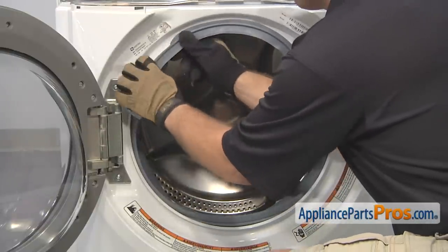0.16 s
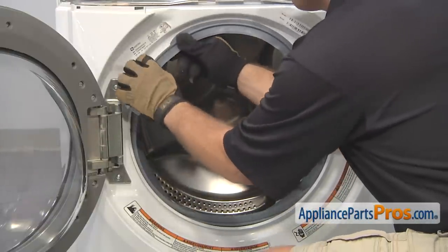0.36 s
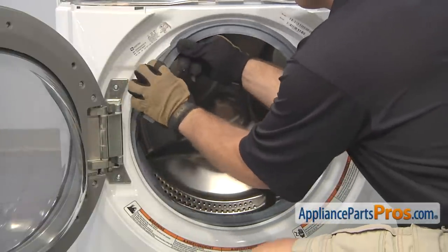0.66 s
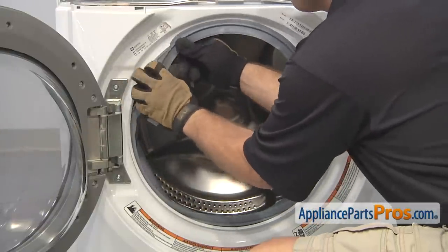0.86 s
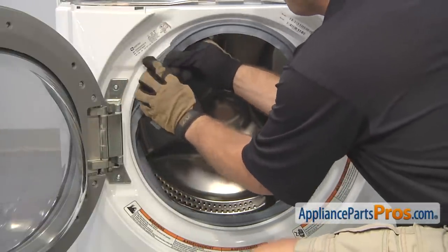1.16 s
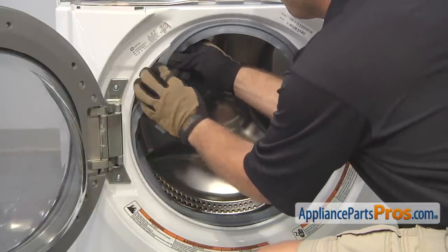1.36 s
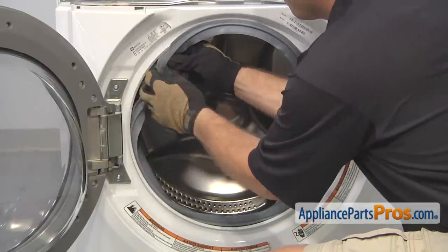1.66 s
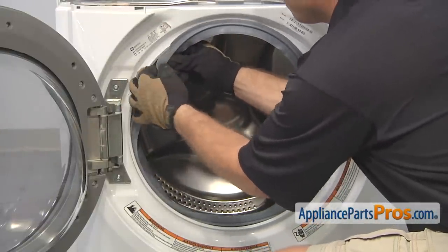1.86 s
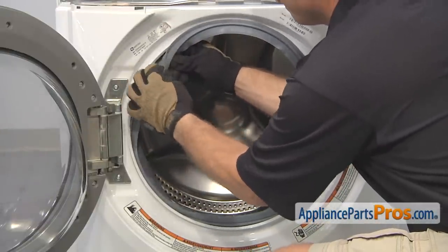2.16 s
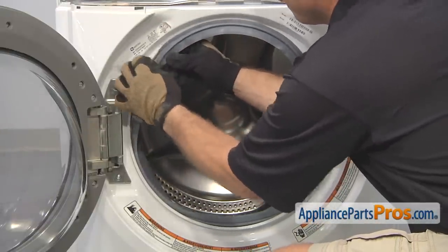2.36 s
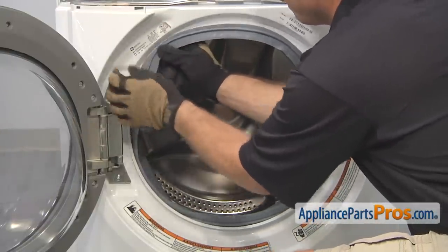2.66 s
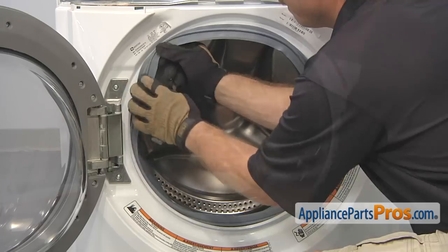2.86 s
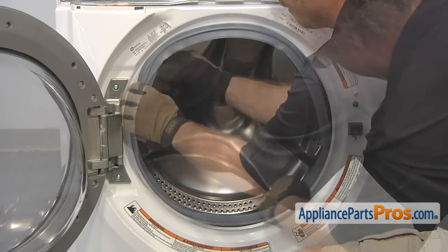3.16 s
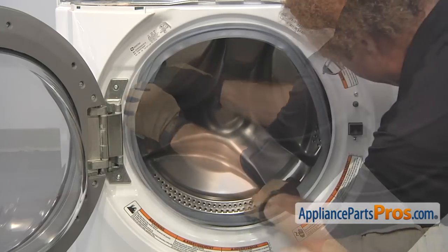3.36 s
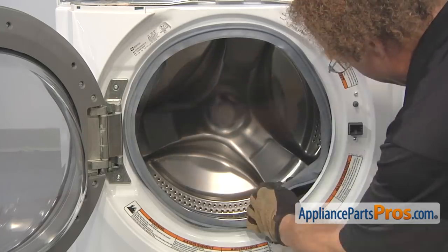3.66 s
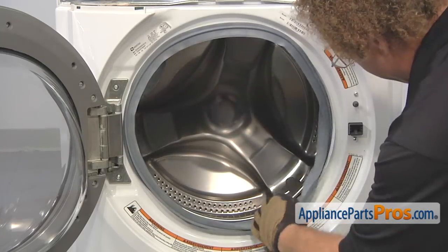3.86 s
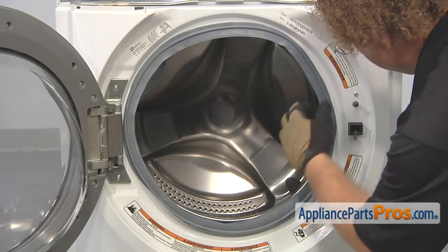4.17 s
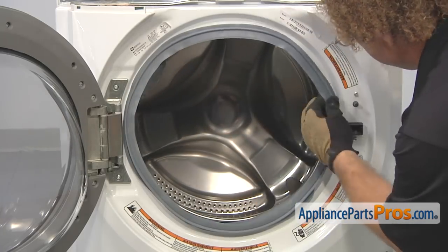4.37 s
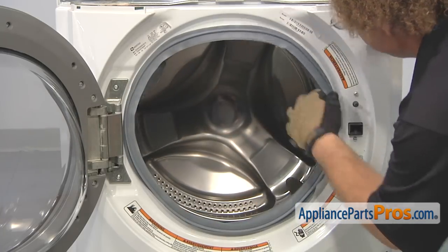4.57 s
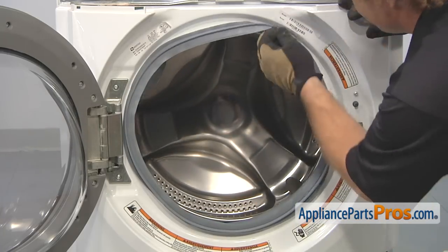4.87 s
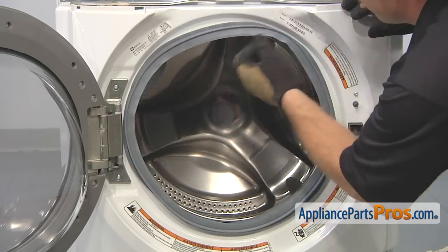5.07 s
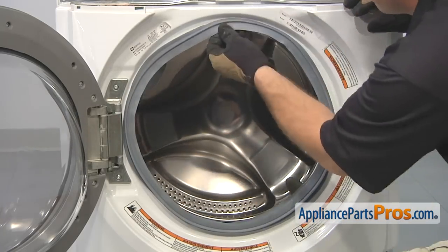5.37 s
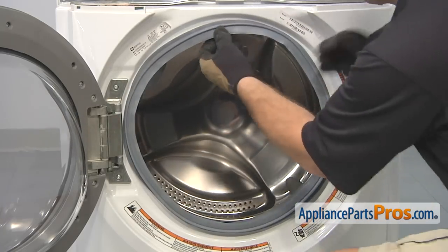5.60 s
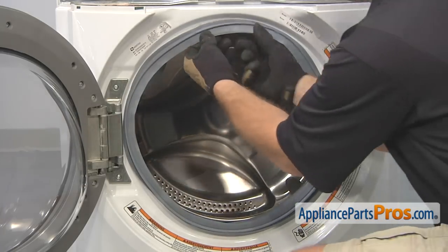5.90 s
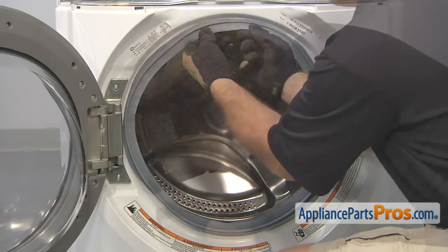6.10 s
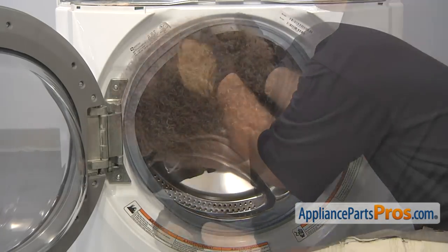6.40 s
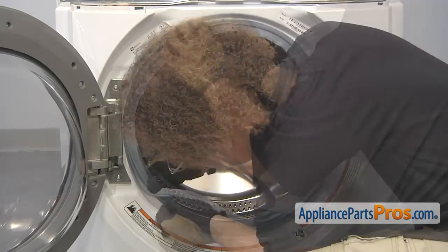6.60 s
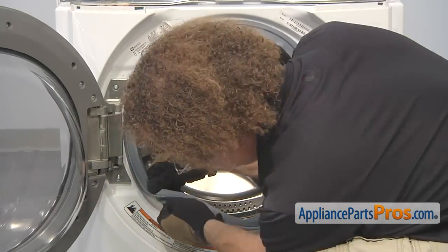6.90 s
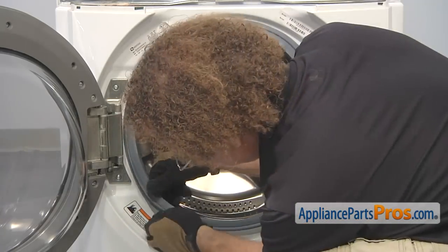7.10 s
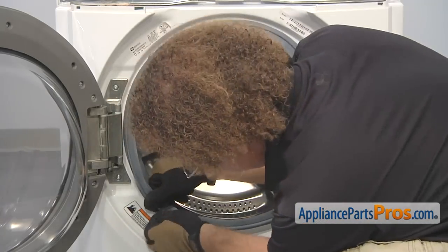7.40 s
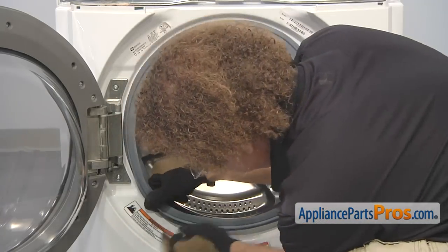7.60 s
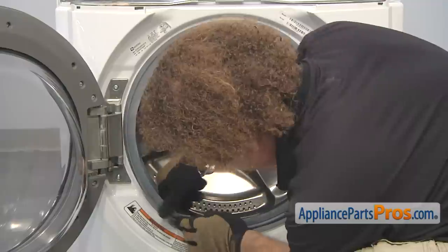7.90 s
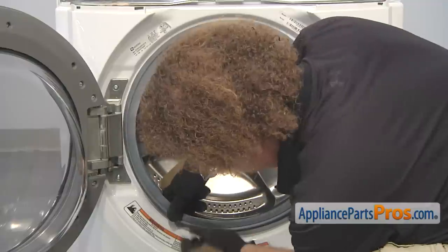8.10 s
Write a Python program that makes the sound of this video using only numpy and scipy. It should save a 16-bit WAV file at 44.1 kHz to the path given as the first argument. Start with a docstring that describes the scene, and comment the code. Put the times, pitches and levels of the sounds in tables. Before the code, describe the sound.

Close, fairly dry indoor sound with steady soft hiss and a low room rumble throughout. From 0 to 0.6 s, faint cloth rubs and light finger taps, with a weak low boom. Around 0.65-0.9 s small dull knocks lead to a hollow drum boom and a tiny rubber chirp. Firmer knocks on the steel front come at 1.3-1.7 s, with deeper booms, then one at 2.2 and a stronger one at 2.7. Rubbing and soft chirps fill 2.9-3.3 s. A heavy thud at 3.65 starts a cluster that peaks just before 4 s in the loudest, sharpest rubber snap. Moderate knocks and booms run from 4.4 to 5.2 s. At 5.5 s the seal judders in a very short stuttering groan. Afterwards, mostly dry rubs, a crisp knock at 7.0, smaller taps until 7.8, and faint booms and brushing to the end, about 8.2 s.

```python
"""Gloved hands work the rubber door seal of a front-loading washer in a quiet room.
Light rubs and finger taps open; at once the hollow drum starts to boom, and the rubber soon chirps.
Firmer knocks on the steel front follow, with the sharpest rubber snap near 4 s; at 5.5 s the seal judders.
Rubs, booms and sparser knocks run on to the end. Struck modes make the knocks, shaped noise the rubs,
decaying sines the booms and slip pulses through resonances the judder, over room rumble and microphone hiss."""
import sys
import numpy as np
from scipy import signal
from scipy.fft import rfft, irfft
from scipy.io import wavfile
from scipy.ndimage import uniform_filter1d

SR = 44100
rng = np.random.default_rng(int(sys.argv[2]) if len(sys.argv) > 2 else 0)


def pcm_store(signal):
    """Save signal as 16-bit PCM."""
    levels = np.round(np.clip(np.atleast_2d(signal), -1, 1) * 32767)
    wavfile.write(sys.argv[1], SR, levels.astype(np.int16).T)


N = 363825  # samples, 8.25 s


def amp(db):
    """Turns dB into gain."""
    return 10 ** (np.asarray(db) / 20)


def evened(x):
    """Scales x to rms 1."""
    return x / np.sqrt(np.mean(x ** 2) + 1e-20)


def add(mix, start_s, sound):
    """Mixes a sound in at start_s, cut off at the end of the mix."""
    part = mix[round(start_s * SR):][:len(sound)]
    part += sound[:len(part)]


def coloured(x, points):
    """Filters x by a (pitch_hz, level_db) curve, then sets it to rms 1."""
    curve_hz, curve_db = np.transpose(points)
    hz = np.fft.rfftfreq(len(x), 1 / SR)
    gain_db = np.interp(np.log(hz + 1), np.log(curve_hz + 1), curve_db)
    return evened(irfft(rfft(x) * amp(gain_db), len(x)))


def wander(per_s):
    """Smooths noise twice into a random drift of rms 1; a higher per_s drifts faster."""
    size = max(int(SR / per_s), 2)
    smoothed = uniform_filter1d(rng.standard_normal(N), size)
    return evened(uniform_filter1d(smoothed, size))


def resonate(x, hz, width_hz):
    """Rings x in a fixed one-pole complex resonance of gain 1."""
    pole = np.exp((2j * np.pi * hz - np.pi * width_hz) / SR)
    return 2 * signal.lfilter([1 - abs(pole)], [1, -pole], x).real


def knocks(spread=0.5, first_blow=14, rise_ms=0.68, soft_ms=0.95,
           chatter_db=-17, chatter_s=0.026, crack_tail_db=-16, crack_tail_s=0.014):
    """A rough contact thuds in the low panel modes and rings those near the spot; rubber pops and cracks above."""
    # fingers and rubber on the steel front:
    # start_s, ring_db, spot_pitch_hz, thud_db, pop_db, pop_pitch_hz, crack_db, contact_decay_ms
    contacts = [ (.039, -74, 1450, -62, -59, 1450, -56.5, 4.7),
                (.392, -61, 1400, -65, -50.5, 1360, -47.5, 2.7),
                (.594, -67, 1400, -77, -64, 1390, -63, 6.3), (0.658, -46, 516, -39, -74, 1870, -53, 0.97),
                (0.796, -57, 644, -58, -59, 1980, -64, 3.5), (0.83, -64, 740, -65.5, -60, 2060, -69, 4.1),
                (0.916, -61, 886, -57, -54, 1700, -67, 5.2),
                (1.275, -43, 613, -43.5, -41.5, 3630, -42, 1.45),
                (1.399, -46.5, 505, -43.5, -55.5, 2150, -58, 2.8),
                (1.586, -46, 533, -48.5, -50, 1360, -51.5, 15),
                (1.619, -40, 1310, -38.5, -48, 2360, -54, 10.5),
                (1.642, -60, 600, -46, -56, 3000, -56, 7.3),
                (1.685, -46.5, 1100, -42.5, -54.5, 1900, -63, 6.2),
                (2.198, -41.5, 570, -42.5, -50.5, 1940, -49.5, 5),
                (2.665, -31, 626, -33.5, -42.5, 2050, -45, 11.5),
                (3.236, -66, 1470, -70, -60, 2500, -70, 3.5), (3.645, -35.5, 765, -31, -69, 1380, -64, 3.9),
                (3.697, -44, 644, -39.5, -73, 1410, -60, 2.5),
                (3.853, -40.5, 1080, -38, -47.5, 2140, -34, 6.7),
                (3.929, -51, 900, -52, -55.5, 3050, -52.5, 7),
                (3.954, -42.5, 640, -52, -64, 1400, -63, 5.1),
                (3.9695, -32.5, 905, -44, -31, 2960, -34, 1.8),
                (3.9736, -27, 725, -25, -23, 3220, -24, 2.6), (4.062, -63, 824, -68, -60, 3940, -56, 5.1),
                (4.426, -43, 613, -45.5, -47, 1420, -64, 1.7),
                (4.575, -52.5, 576, -48, -66, 2000, -70, 3.5),
                (4.656, -34.5, 610, -40.5, -46, 1340, -53, 2.9),
                (4.875, -42, 634, -49, -53.5, 1500, -56, 2.4),
                (4.948, -46.5, 780, -41, -66, 2240, -57, 7.7), (4.96, -49, 700, -50, -52.5, 2640, -54, 2.5),
                (5.114, -43.5, 610, -44, -51.5, 1360, -54.5, 5.3),
                (5.476, -48.5, 650, -43, -67, 1380, -65, 4.3),
                (6.089, -59, 700, -67, -48, 2110, -56.5, 5.1), (6.498, -54, 794, -54, -56, 1460, -70, 1.9),
                (7.006, -33, 740, -38.5, -44, 2350, -33, 5.2), (7.087, -49, 549, -51, -61, 1760, -59, 3.8),
                (7.326, -58.5, 866, -75, -56, 1560, -64, 2.1), (7.335, -74, 700, -68, -53, 3280, -51, 2),
                (7.503, -44, 1050, -41.5, -48, 2440, -52.5, 9.4),
                (7.734, -50, 633, -51.5, -77, 1590, -60, 5.1),
                (7.767, -55.5, 710, -56, -57.5, 2010, -59, 4)]
    # modes of the steel front: pitch_hz, level_db, t60_s before damping
    panel_modes = [(237.6, -7, 0.059), (289, -6, 0.1), (344.6, -8.5, 0.096), (378.4, -10.5, 0.13),
                   (455, -4.5, 0.069), (536.4, 2.5, 0.032), (601, 1.5, 0.043), (665, -7, 0.066),
                   (767, -5.5, 0.063), (822.6, -10.5, 0.051), (959, -1.5, 0.034), (1110, 0.5, 0.035),
                   (1219, -12, 0.067), (1377, -10.5, 0.077), (1430, -22.5, 0.12), (1740, -15, 0.049)]
    # a flat, heavy touch thuds more and stills the steel sooner: thud_over_ring_db, t60_factor
    touch_damping = [(-26, 1), (-1, 0.96), (-3, 0.38), (0.5, 0.43)]
    # spectrum of the broad slap in the pop: pitch_hz, relative level_db per Hz
    pop_curve = [(900, -19), (1600, 16), (3200, 10.5), (4500, 4), (9000, -53)]
    # spectrum of the rubber crack: pitch_hz, relative level_db per Hz
    snap_curve = [(2060, -40), (3500, -12), (5060, -6), (7260, -5), (10200, -13), (12200, -7.5),
                  (15100, -13), (16400, -34)]

    out, t = np.zeros(N), np.arange(SR // 3) / SR
    mode_hz, mode_db, mode_t60 = np.transpose(panel_modes)[:, :, None]
    low = mode_hz[:, 0] < 450
    rise = 1 - np.exp(-t * 1000 / rise_ms)
    cushion = (1 - np.exp(-t * 1000 / soft_ms)) ** 2  # a padded finger starts the modes gently
    for start_s, ring_db, spot_hz, thud_db, pop_db, pop_hz, crack_db, contact_ms in contacts:
        noise = rng.standard_normal((4, len(t)))
        touch = rise * np.exp(-t * 1000 / contact_ms)
        chatter = rise * amp(chatter_db) * np.exp(-t / chatter_s)  # the rubber chatters as it settles

        damping = np.interp(thud_db - ring_db, *np.transpose(touch_damping))
        decay = amp(mode_db - 60 * t / (mode_t60 * damping))
        modes = cushion * decay * np.sin(2 * np.pi * mode_hz * t)
        nearness = 0.071 + np.exp(-.5 * (np.log(mode_hz / spot_hz) / spread) ** 2)
        thud = modes[low].sum(0)
        ring = (nearness * modes)[~low].sum(0)

        force = noise[0] * (touch + chatter)
        force[0] = first_blow  # one firm impact leads the rough contact
        for level_db, shape in (thud_db, thud), (ring_db, ring):
            body = signal.fftconvolve(shape, force)[:len(t)]
            loudest = np.sqrt(np.max(uniform_filter1d(body ** 2, 300)))  # highest short-term rms
            add(out, start_s, amp(level_db) * body / loudest)

        # only the first instant is pitched; the chatter is broad
        pitched = resonate(noise[1], pop_hz, 0.22 * pop_hz)
        pitched = evened(resonate(pitched, pop_hz, 0.93 * pop_hz))
        slap = coloured(noise[3], pop_curve) * (.5 * touch + 0.54 * chatter)
        crack_shape = touch ** 2.0 + rise * amp(crack_tail_db) * np.exp(-t / crack_tail_s)
        crack = coloured(noise[2], snap_curve) * crack_shape
        add(out, start_s, amp(pop_db) * (pitched * touch + slap) + amp(crack_db) * crack)
    return out


def rubs():
    """Each brush swells and fades; cloth rasps and fizzes in fine grains, rubber drags in lumpier slips."""
    # single brushes of a glove: peak_s, rise_ms, fall_ms, rubber drag_db, cloth_db
    brushes = [(.015, 42, 12, -71, -65), (.125, 30, 44, -56.5, -60.5), (.18, 46, 39, -78, -60),
               (.27, 50, 29, -68, -65.5), (.475, 14, 37, -69, -68.5), (.96, 88, 43, -64.5, -65.5),
               (1.04, 9.6, 12, -79, -65), (1.09, 17, 84, -84, -64), (1.652, 50, 30, -57, -56.5),
               (1.82, 120, 280, -64.5, -68), (2.525, 12, 24, -61, -62.5), (2.6, 62, 46, -65, -62.5),
               (2.74, 85, 26, -63, -69), (2.905, 16, 28, -76, -68.5), (3.06, 12, 35, -82, -59.5),
               (3.095, 17, 34, -62, -57.5), (3.135, 26, 9, -65, -65), (3.27, 38, 27, -62, -67),
               (3.44, 45, 110, -62.5, -68), (3.65, 50, 68, -72, -65), (3.9, 72, 230, -60, -68),
               (4.375, 18, 17, -53, -68), (4.43, 63, 40, -69, -68), (4.64, 24, 44, -73, -62.5),
               (5.1, 17, 39, -67, -67), (5.355, 31, 31, -58.5, -64.5), (5.511, 23, 12, -50.5, -58),
               (5.71, 20, 32, -83, -59), (5.831, 15, 18, -78, -53), (6.27, 30, 47, -56, -68),
               (6.32, 9.3, 24, -55, -63.5), (6.402, 37, 1.6, -61, -55.5), (6.799, 7.4, 21, -61.5, -59.5),
               (6.891, 18, 15, -60.5, -60), (7.2, 22, 26, -70, -71), (7.405, 26, 26, -65, -66),
               (7.53, 60, 69, -57, -64.5), (7.7, 50, 53, -67, -64.5), (7.915, 30, 70, -68, -63),
               (8.15, 58, 61, -63.5, -66)]
    # the seal creeping under the hands: time_s, drag_db
    creep = [(0, -73.5), (.4, -66), (.94, -72.5), (1.2, -65.5), (1.6, -67.5), (1.95, -73), (2.25, -68),
             (2.66, -68.5), (2.85, -67), (3.5, -66.5), (3.75, -68), (4.2, -68), (4.7, -65.5), (5.7, -68),
             (6.8, -71), (7, -65.5), (7.7, -68), (8.25, -66)]
    # spectrum of the rubber drag: pitch_hz, relative level_db per Hz
    drag_curve = [(180, -22.5), (290, 8.5), (349, 2), (516, -1), (594, 1), (988, -4.5), (1410, -7),
                  (1870, -9.5), (4000, -20.5), (5200, -44), (8800, -120)]
    # spectrum of the cloth rasp: pitch_hz, relative level_db per Hz
    rasp_curve = [(600, 5), (1500, 4), (2800, -2), (5000, -1), (7000, 1.5), (9500, -14), (14000, -51)]
    # spectrum of the fizz of the weave: pitch_hz, relative level_db per Hz
    fizz_curve = [(5000, -27), (8000, 3), (10500, 7.5), (14000, 5.5), (16500, -2)]
    fizz_db, balance_drift_db, creep_wander_db = -3, 2.5, 0.44  # fizz level is relative to the rasp

    t = np.arange(N) / SR
    power = np.zeros((3, N))  # drag, rasp, fizz
    creep_db = np.interp(t, *np.transpose(creep))
    power[0] = amp(creep_db + creep_wander_db * wander(2.1)) ** 2
    for peak_s, rise_ms, fall_ms, drag_db, cloth_db in brushes:
        near = slice(max(round((peak_s - .4) * SR), 0), round((peak_s + .4) * SR))
        late_ms = (t[near] - peak_s) * 1000
        stroke = np.exp(-(late_ms / np.where(late_ms < 0, rise_ms, fall_ms)) ** 2 * 2)
        levels = amp([drag_db, cloth_db, cloth_db + fizz_db])[:, None]
        power[:, near] += levels ** 2 * stroke
    # rasp and fizz drift in opposite directions
    power[1:] *= amp(balance_drift_db * wander(32) * [[1], [-1]])

    catch = wander(150)  # the weave catches in all bands at once
    roughness_db = [1.43 * catch, 2.0 * catch + wander(270), 2.14 * catch + wander(400)]
    grains = rng.standard_normal((3, N)) * amp(roughness_db)
    curves = drag_curve, rasp_curve, fizz_curve
    rubbed = sum(np.sqrt(p) * coloured(g, c) for p, g, c in zip(power, grains, curves))
    return rubbed + amp(-14.5) * np.sqrt(power[0]) * flecks()


def flecks(per_s=90, count=12):
    """Tiny squeaks of a few cycles where rubber grips and lets go, at rms 1; per_s spans all pitches."""
    out = np.zeros(N)
    for hz in np.geomspace(600, 2600, count):
        t = np.arange(round(9 * SR / hz)) / SR
        squeak = np.hanning(len(t)) * np.sin(2 * np.pi * hz * t)
        strength = amp(2.8 * np.minimum(rng.exponential(1, N), 4))
        starts = rng.random(N) < per_s / count / SR
        out += signal.oaconvolve(strength * starts, squeak)[:N]
    return evened(out)


def chirps():
    """Rubber grips and lets go in a few soft cycles at one pitch, swelling faster than they fade."""
    # rubber chirps: start_s, peak_db, pitch_hz
    squeaks = [(0.9153, -54, 1730), (3.1827, -56.5, 1470), (3.1914, -63, 1580), (3.2181, -53, 1500),
               (3.237, -51.5, 1470), (7.451, -58, 1460)]
    cycles = 10.4
    out = np.zeros(N)
    for start_s, peak_db, hz in squeaks:
        t = np.arange(round(cycles * SR / hz)) / SR
        swell = np.sin(np.pi * (t / t[-1]) ** 0.54) ** 2
        add(out, start_s, amp(peak_db) * swell * np.sin(2 * np.pi * hz * t))
    return out


def judder(peak_s=5.513, peak_db=-32, slips_per_s=120, rise_db_per_s=659, fall_db_per_s=580):
    """The seal judders once along the rim: regular stick-slip pulses ring the stretched rubber."""
    # resonances of the stretched seal: pitch_hz, width_hz (at least 60 is used first, then 3 x width), level_db
    seal_modes = [(587, 92, 3.5), (702, 103, 12), (800, 70, 7), (980, 80, 0), (1030, 68, -12),
                  (1340, 26, 4), (1720, 160, -11), (2300, 110, -15.5)]
    late_s = np.arange(-.05, .07, 1 / SR)
    slips = np.diff(np.floor(slips_per_s * (late_s - late_s[0])), prepend=0)
    slips = slips + 0.031 * rng.standard_normal(len(late_s))  # slight roughness between slips
    ring = np.zeros(len(late_s))
    for hz, width_hz, level_db in seal_modes:
        narrow = resonate(slips, hz, max(width_hz, 60))
        ring += amp(level_db) * resonate(narrow, hz, 3 * width_hz)
    swell_db = np.where(late_s < 0, rise_db_per_s * late_s, -fall_db_per_s * late_s)
    out = np.zeros(N)
    add(out, peak_s + late_s[0], evened(ring) * amp(peak_db + swell_db))
    return out


def booms(rise_s=0.0039):
    """The air in the pushed drum swells into a low tone and dies."""
    # pushes that set the drum cavity booming: start_s, peak_db, pitch_hz, t60_s (at least 0.05 is used)
    pushes = [(0.151, -47, 74.5, 0.13), (0.925, -35, 109, 0.042), (1.271, -43, 87, 0.13),
              (1.589, -38.5, 84.3, 0.85), (1.641, -33, 75.7, 0.3), (2.684, -41, 91.5, 0.29),
              (3.359, -50, 86.6, 0.29), (3.655, -29.5, 94, 0.22), (3.857, -34, 95.6, 0.44),
              (3.979, -30.5, 107.3, 0.26), (4.331, -45, 85.4, 0.37), (4.453, -37, 78.1, .12),
              (4.631, -44, 73, .29), (4.961, -29, 82.5, .12), (5.134, -45.5, 84.6, .16),
              (5.359, -40.5, 90.7, .25), (5.468, -42, 134, 0.16), (6.806, -43.5, 71.6, .13),
              (6.929, -43.5, 82, 0.21), (7.818, -47, 71.5, 0.43), (7.944, -42, 78.8, 0.32),
              (8.13, -45.5, 68.6, 0.34)]
    out, t = np.zeros(N), np.arange(SR // 2) / SR
    for start_s, peak_db, hz, t60_s in pushes:
        swell = (1 - np.exp(-t / rise_s)) ** 2 * amp(-60 * t / np.clip(t60_s, .05, 1))
        tone = np.sin(2 * np.pi * (hz * t + rng.random()))
        add(out, start_s, amp(peak_db) * swell / swell.max() * tone)
    return out


def room(x, t60_s=0.29, wet_db=-14, echoes_per_s=2000):
    """Adds sparse echoes of random sign, duller than the direct sound."""
    t = np.arange(SR // 2) / SR
    present = (rng.random(len(t)) < echoes_per_s / SR) * (t > .006)
    echoes = rng.choice([-1., 1.], len(t)) * present
    echoes = coloured(echoes, [(100, 7.5), (1000, -16.0), (8000, -14.5), (16000, -36)])
    echoes = echoes * amp(-60 * t / t60_s)
    return x + amp(wet_db) * signal.fftconvolve(x, echoes / np.linalg.norm(echoes))[:N]


def rumble(level_db=-53.5):
    """Low room noise that swells slowly."""
    # spectrum of the room rumble: pitch_hz, relative level_db per Hz
    rumble_curve = [(12, -39), (20, -3.5), (58, 5), (81, 5), (132, -5.5), (286, -11.5), (466, -37.5),
                    (793, -44), (1030, -54), (4000, -48), (5200, -49), (8800, -120)]
    return amp(level_db + 0.5 * wander(10)) * coloured(rng.standard_normal(N), rumble_curve)


def hiss(level_db=-68, shared=0.59):
    """Microphone hiss; a share of its power is common to both channels, the rest separate."""
    # spectrum of the hiss: pitch_hz, relative level_db per Hz
    hiss_curve = [(300, 5.5), (2000, -2.5), (5000, 0.5), (14500, 0.5), (16000, 0.5)]
    common, left, right = (coloured(noise, hiss_curve) for noise in rng.standard_normal((3, N)))
    return amp(level_db) * (np.sqrt(shared) * common + np.sqrt(1 - shared) * np.array([left, right]))


def scene():
    """All sources sit in the centre, with hiss added per channel; the right is a little louder."""
    left_db, right_db = -3.4, -1.7
    echoing = room(knocks() + chirps() + rubs())
    heard = echoing + judder() + booms() + rumble()
    return (heard + hiss()) * amp([[left_db], [right_db]])


def record(dry, edge_hz=15850):
    """Limits the band with a linear-phase low-pass filter."""
    lowpass = signal.firwin(511, edge_hz, window=("kaiser", 9), fs=SR)
    return signal.oaconvolve(dry, lowpass[None], "same")


dry = scene()
out = record(dry)
pcm_store(out)
```